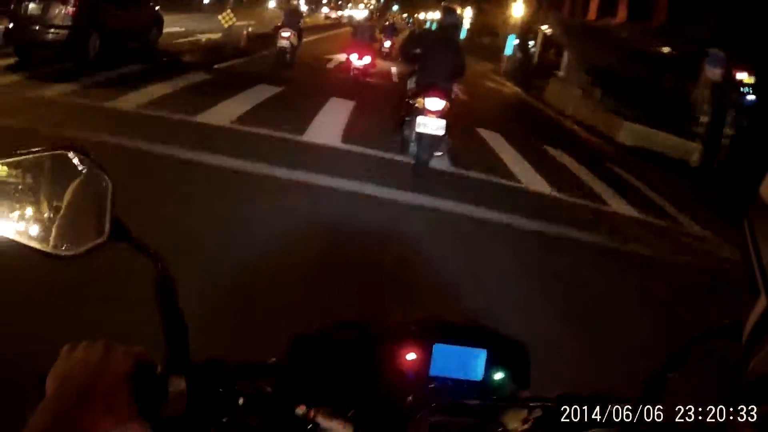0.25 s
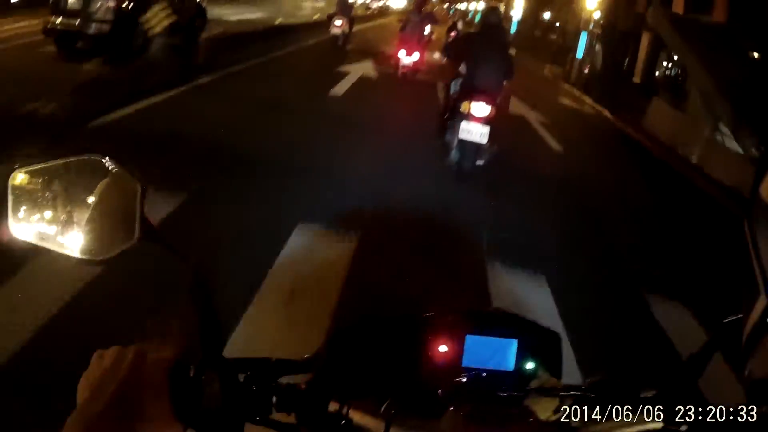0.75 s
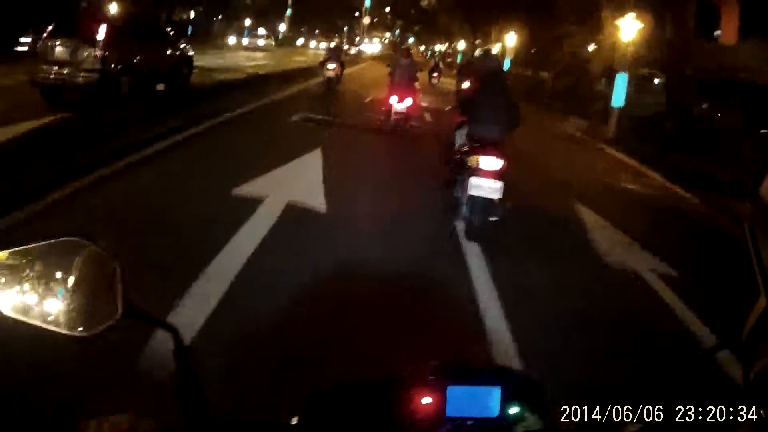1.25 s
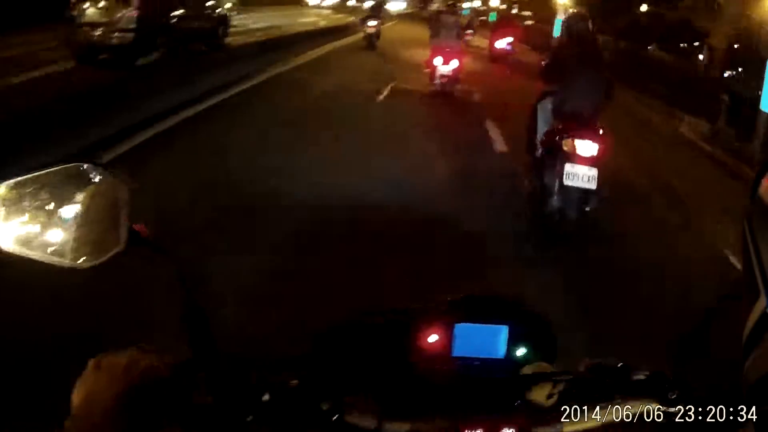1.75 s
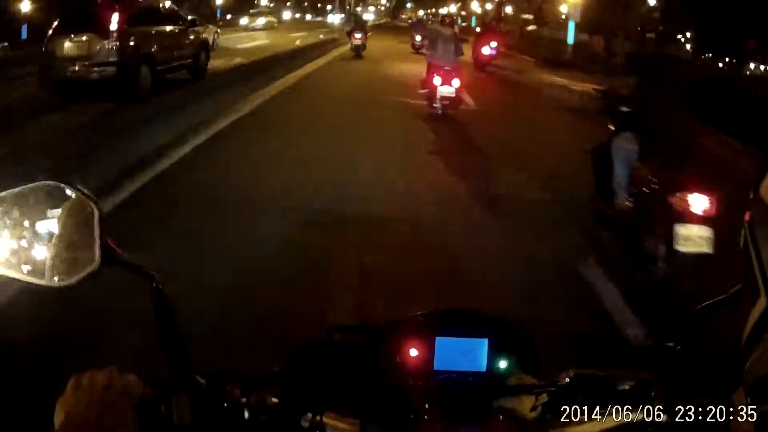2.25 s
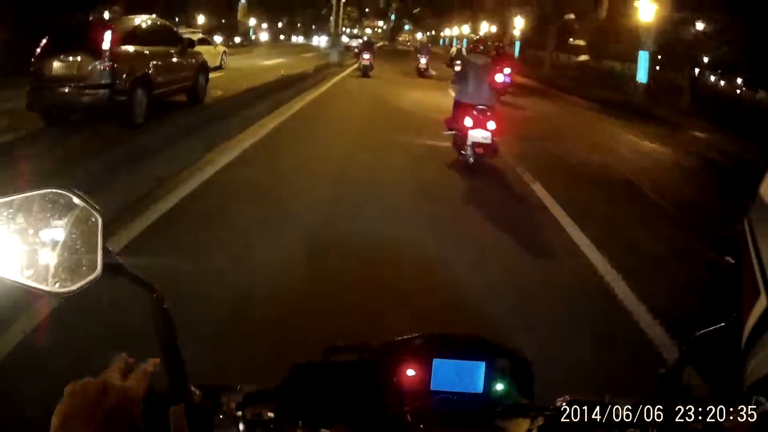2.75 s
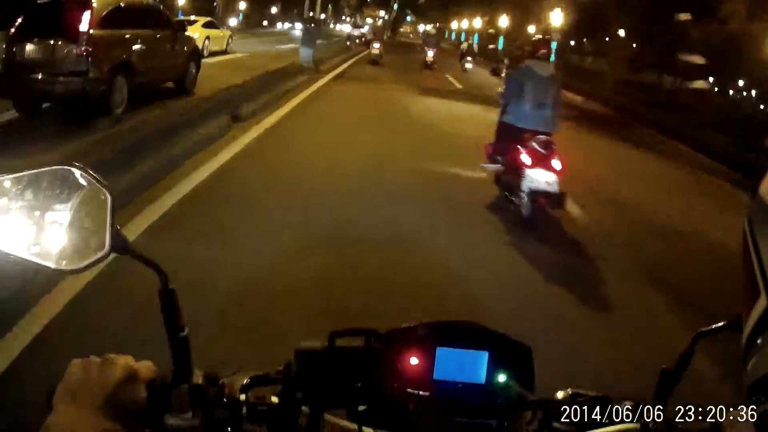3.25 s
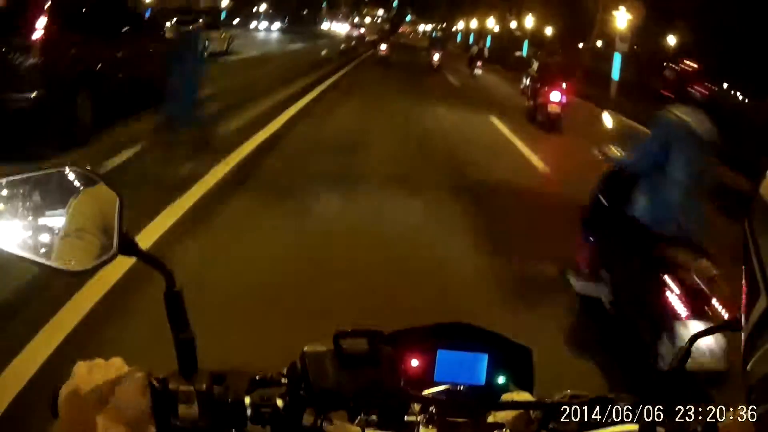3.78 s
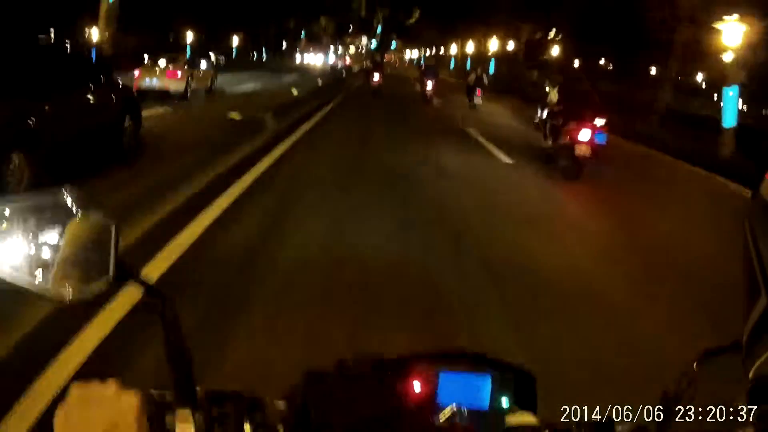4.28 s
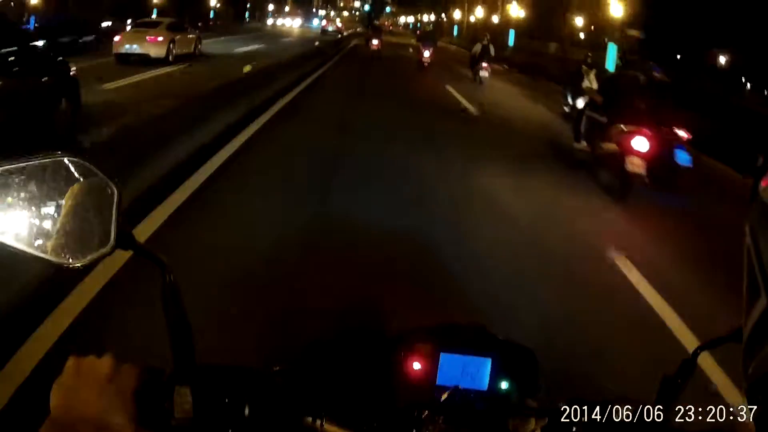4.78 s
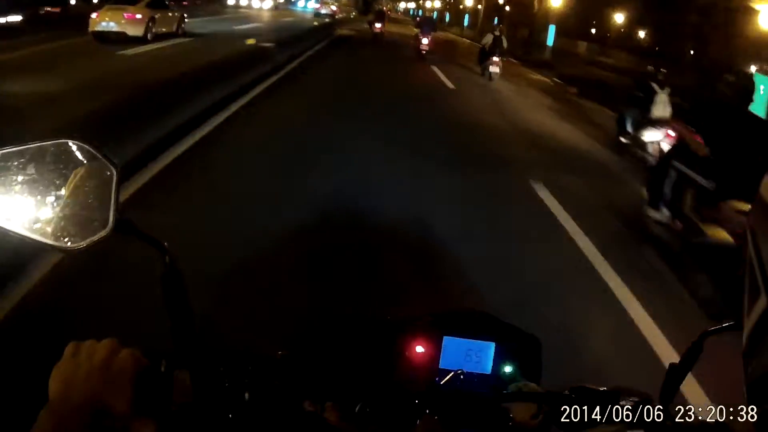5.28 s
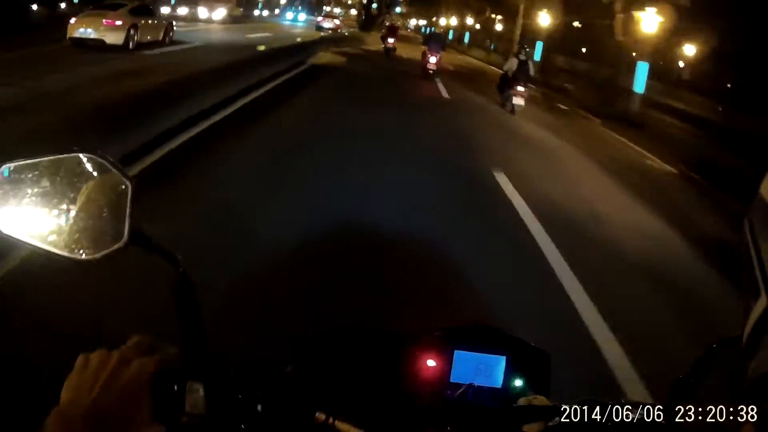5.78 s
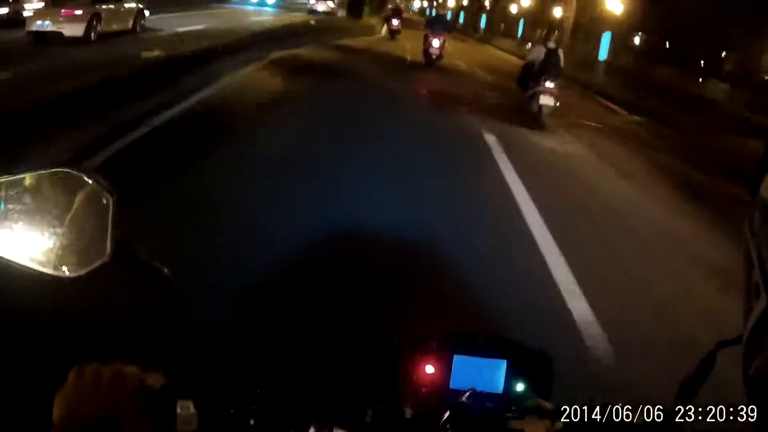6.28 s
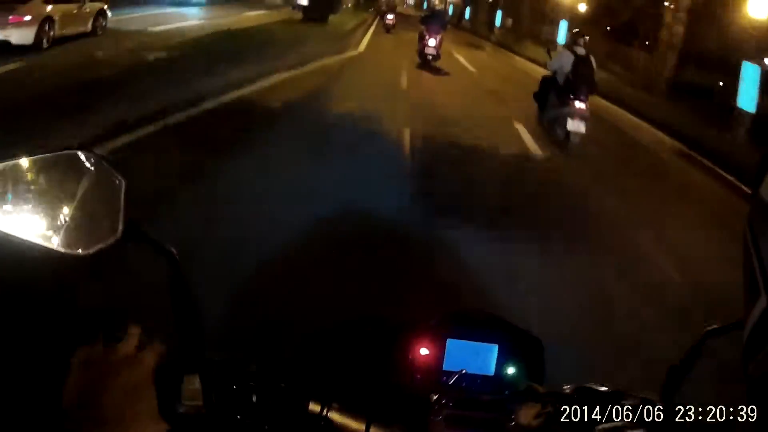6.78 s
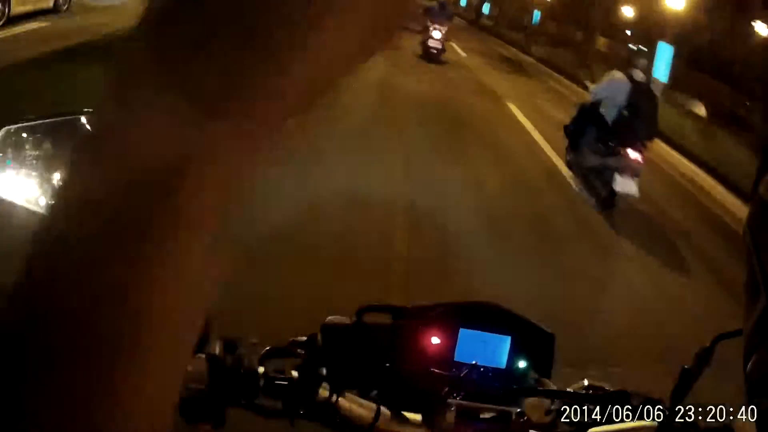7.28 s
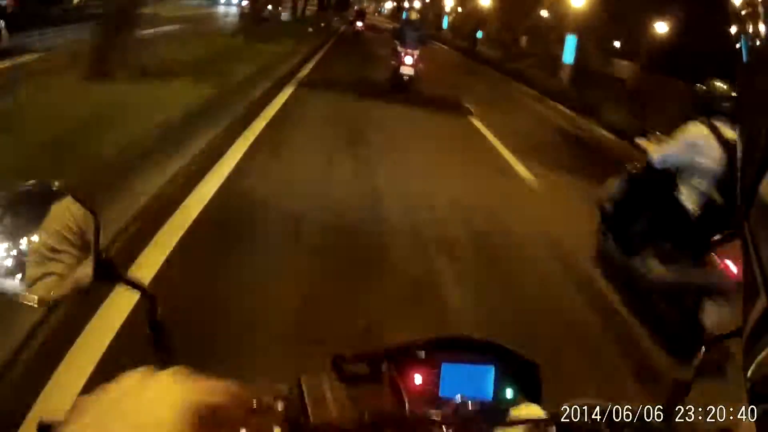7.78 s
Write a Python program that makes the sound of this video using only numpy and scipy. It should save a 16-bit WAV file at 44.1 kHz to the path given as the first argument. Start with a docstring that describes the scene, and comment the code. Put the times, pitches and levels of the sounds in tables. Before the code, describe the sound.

Wind rumbles over a rider's microphone as a motorcycle gathers speed along a road. The close engine dips briefly, then climbs with a pulsing exhaust and metallic rasp, shifts up and climbs again. The wind grows into heavy, low buffeting that overloads into crackle, with occasional small dry snaps. Near the end the throttle eases and the engine settles to a softer, steady whirr beneath the gusts.

```python
"""A single-cylinder motorcycle pulls away through the gears, heard from a camera on the rider.
At first the revs drop under a thin, fading whine. Then the throttle opens: every firing thumps
the exhaust pipe, and a hard metallic rasp bites between the thumps. A gear change breaks the pull
near 3.5 s, while the building wind buffets the microphone and overloads it into crackle.
At 6 s the rider eases off and cruises, the rasp loosening to a whirr under gusts and dry ticks."""
import sys
import numpy as np
from scipy import signal
from scipy.fft import rfft, irfft, next_fast_len
from scipy.io import wavfile
from scipy.ndimage import uniform_filter1d

SR = 44100
rng = np.random.default_rng(int(sys.argv[2]) if len(sys.argv) > 2 else 0)


def digitize_waveform(pressure):
    """Quantize a signal to 16-bit integers and store it at the path in sys.argv[1].

    Rows of a 2-D input are taken as channels; values are limited to [-1, 1].
    """
    field = np.atleast_2d(pressure).T
    bounded = np.clip(field, -1, 1)
    quanta = np.round(bounded * 32767).astype(np.int16)
    wavfile.write(sys.argv[1], SR, quanta)


N = 354563
TIME = np.arange(N) / SR

# the engine pulls, drops at each gear change, then cruises: time_s, firing_rate_hz
REVS = [(0, 42.23), (.13, 41.96), (.3, 32.34), (.65, 32.54), (1.35, 36.13), (2.4, 42.53), (3.03, 45.95),
        (3.3, 47.27), (3.42, 46.57), (3.55, 37.45), (4.45, 39.69), (5.6, 43.21), (6, 44.09), (6.15, 43),
        (6.35, 36.7), (7.1, 36.1), (8.04, 35.7)]
# air streaming past the camera: time_s, share_of_top_speed (0-1)
AIRSPEED = [(0, 0.3), (1, 0.19), (2.2, 0.43), (3.1, 0.73), (4.3, 0.8), (5.9, 0.93), (7.3, 0.88),
            (8.04, 0.75)]
# ringing engine metal: pitch_hz, width_hz, level_db
METAL_MODES = [(820, 340, -9), (1148, 194, 5), (1437, 216, 7), (1619, 160, 7.5), (1747, 317, 3),
               (2166, 540, -12.5)]
# the hollow camera housing, rung by the engine's treble: pitch_hz, width_hz, level_db
HOUSING_MODES = [(3287, 640, -1), (3735, 840, -10), (5200, 870, -21.5), (5700, 550, -18.5),
                 (6980, 830, -19.5), (8040, 910, -22.5), (9900, 1100, -26.5), (13100, 1700, -27.5),
                 (14800, 2100, -23.5)]


def exhaust(cycles, spread_db=0.36, bark_db=-29, gas_db=-25, shell_db=-28, hum_db=-28):
    """Each exhaust valve opening thumps the pipe; a gas puff rings pipe and metal; the crank hums."""
    # the body of the thump, the pipe's resonances: pitch_hz, width_hz, level_db
    pipe_modes = [(49.4, 20, -7.5), (74.3, 57.8, 1.5), (178.5, 46.4, -2.5), (252.7, 83, 2),
                  (323.3, 39, -1.5), (398.8, 34, -10.5), (465.5, 38, -11), (503.7, 53.6, -8.5),
                  (579, 83, -22.5)]
    # the bark, the exhaust's upper overtones: pitch_hz, width_hz, level_db
    bark_modes = [(665, 96, -6), (835, 120, -11.5), (1135, 63, -2.5), (1300, 270, -8.5)]
    clicks = np.diff(np.floor(cycles - .67), prepend=-1) * amp(spread_db * noise())  # one a cycle
    body = thinned(muffler(ring(clicks, pipe_modes)))
    thumps = steadied(body + amp(bark_db) * ring(clicks, bark_modes), size=8000)
    puffs = noise() * burst(cycles, at=.86, width=.11)
    gas = amp(gas_db) * ring(puffs, pipe_modes)
    shell = amp(shell_db) * ring(puffs, METAL_MODES)
    hum = amp(hum_db) * evened(np.cos(4 * np.pi * (cycles - .86)))  # two crank turns to a firing
    gain = effort(rest_db=-20.5, throttle_db=9, airspeed_db=-2, octave_db=2) * overrun()
    return gain * (thumps + gas + shell) + hum


def muffler(x, centre_hz=330, width_hz=170):
    """The silencer chambers delay the low mids, so each thump swells over a few swings."""
    radius = np.exp(-np.pi * width_hz / SR)
    poles = [1, -2 * radius * np.cos(2 * np.pi * centre_hz / SR), radius ** 2]
    return signal.lfilter(poles[::-1], poles, x)  # all-pass


def thinned(x, shut_db=4.0, open_db=-2.5, edge_hz=370):
    """The exhaust note thins with the throttle shut: a high-passed copy reshapes its upper tones."""
    upper = signal.sosfiltfilt(signal.butter(4, edge_hz, "high", fs=SR, output="sos"), x)
    upper_gain = amp(shut_db + (open_db - shut_db) * throttle())
    return x + (upper_gain - 1) * upper


def overrun(dip_db=-2.5, full_fall_hz_per_s=50):
    """Gain of the firings: they weaken while the engine winds down."""
    fall = uniform_filter1d(-np.gradient(curve(REVS)) * SR, size=3000)
    return amp(dip_db * np.clip(fall / full_fall_hz_per_s, 0, 1))


def throttle():
    """How wide the throttle stands, 0-1."""
    # the rider opens up, shuts off for each gear change, then eases off: time_s, opening (0-1)
    twist_grip = [(0, 0.33), (.22, 0), (.72, 0.02), (.92, 0.25), (1.18, 0.19), (1.42, 0.69), (2.1, 0.68),
                  (2.7, 0.83), (3.22, 0.85), (3.44, 0.04), (3.62, 0.64), (4.4, 0.81), (5.2, 0.9),
                  (5.88, .82), (6.05, 0.06), (7.1, 0.09), (8.04, 0.3)]
    return np.clip(curve(twist_grip), 0, 1)


def effort(rest_db, throttle_db, airspeed_db, octave_db, low_revs_hz=33):
    """Gain of an engine layer: it rides the throttle, the airspeed and each octave of revs."""
    octaves = np.log2(curve(REVS) / low_revs_hz)
    return amp(rest_db + throttle_db * throttle() + airspeed_db * curve(AIRSPEED) + octave_db * octaves)


def rasp(cycles, pitch_hz=1487, rise_hz=180, uneven_db=5.2, grit_db=-8, fizz_db=-19, loose_db=-1):
    """Under throttle, one hard ringing burst a cycle; shut off, it loosens into a metallic whirr."""
    centre, crack_lead_s = .4412, .0012  # the burst's place in the cycle; its crack comes just ahead
    strength = amp(uneven_db * curve(AIRSPEED) * np.tanh(drift(17)))
    gate = burst(cycles, at=centre, width=.054) * strength
    from_centre_s = cycle_offset(cycles, centre) / curve(REVS)
    phase = 2 * np.pi * (pitch_hz + rise_hz * throttle()) * from_centre_s
    tone = evened(gate * np.sin(phase + .49 * drift(200)))
    crack = noise() * np.roll(gate, -int(crack_lead_s * SR))
    grit = amp(grit_db) * ring(crack, METAL_MODES)
    fizz = amp(fizz_db) * ring(crack, HOUSING_MODES)
    hard = steadied(tone + grit + fizz, size=8000)
    hard_share = .8 * throttle() ** 2
    taps = burst(cycles, at=.88, width=.06) + .6 * burst(cycles, at=.17, width=.05)
    flutter = .8 + 1.5 * np.sqrt(hard_share) * taps
    whirr = amp(loose_db) * steadied(ring(noise() * flutter, METAL_MODES), size=8000)
    blend = np.sqrt(hard_share) * hard + np.sqrt(1 - hard_share) * whirr
    return effort(rest_db=-42.5, throttle_db=12, airspeed_db=2.5, octave_db=6.5) * blend


def clatter(cycles, grain_db=2):
    """Valves tap twice a cycle over the sizzle of the chain."""
    taps = burst(cycles, at=.92, width=.06) + .7 * burst(cycles, at=.15, width=.05)
    sizzle = noise() * amp(grain_db * drift(250))
    gain = effort(rest_db=-56.5, throttle_db=6, airspeed_db=2, octave_db=4.5)
    return gain * ring(sizzle * (1 + taps), HOUSING_MODES)


def wind_rumble(rest_db=-21, airspeed_db=6.55, unsteady_db=1.5):
    """Slow pressure swings on the microphone grow with airspeed and heave in long surges."""
    # the rumble's sub-heavy spectrum: frequency_hz, level_db
    rumble_colour = [(6, -18.5), (18, -3), (30, 1.5), (48, -7), (70, -13), (120, -39), (400, -85)]
    # surges of deep pressure: start_s, length_s, relative_level_db
    surges = [(1.313, 0.029, -10.5), (2.989, 0.032, -8), (3.13, 0.23, -10.5), (3.47, 0.071, -11.5),
              (3.718, 0.083, -8), (4.07, 0.11, -8.5), (4.243, 0.25, -9), (4.649, 0.11, -8),
              (4.913, 0.037, -10), (5.048, 0.13, -6), (5.33, 0.68, -8), (6, 0.046, -11.5),
              (6.195, 0.032, -10), (6.386, 0.24, -6), (6.784, 0.052, -9), (6.924, 0.19, -10),
              (7.295, 0.11, -8), (7.616, 0.17, -11.5)]
    surging = sum(amp(db + 1) * swell(start_s + length_s / 2, half_width_s=.026 + .66 * length_s)
                  for start_s, length_s, db in surges)
    flow = amp(rest_db + airspeed_db * curve(AIRSPEED) + unsteady_db * drift(6.6))
    return np.hypot(flow, surging) * steadied(colour(noise(), rumble_colour), size=3000)


def wind_buffeting(rest_db=-24, airspeed_db=11.23, lumpy_db=1.5, shove_hz=27):
    """Lumpy eddies grow with airspeed; sudden gusts swell them and shove the diaphragm."""
    # the eddies' bassy spectrum: frequency_hz, level_db
    eddy_colour = [(25, -11.5), (55, -1.5), (85, 1), (130, -1.5), (220, -3.5), (330, -5.5), (400, -8.5),
                   (500, -16.5), (570, -25), (680, -40.5), (1100, -38), (2500, -56.5), (6000, -80)]
    # sudden gusts: peak_s, buffeting_db, half_width_s, shove_db
    gusts = [(0.07, -18.5, 0.053, -12.5), (0.302, -21, 0.022, -8.5), (0.492, -15, 0.017, -11),
             (1.25, -13, 0.033, -21), (1.326, -20, 0.013, -11), (3.175, -19, 0.076, -12),
             (3.365, -12, 0.046, -15), (3.769, -20, 0.034, -10.5), (4.391, -15.5, 0.1, -11.5),
             (5.359, -9, 0.056, 1), (5.885, -7, 0.06, -19), (6.11, -10.5, 0.039, -21),
             (6.503, -17.5, 0.049, -12), (6.684, -10.5, 0.052, -4.5), (6.873, -11, 0.052, -17),
             (7.279, -7, 0.03, -8), (7.472, -7, 0.038, -17.5), (7.71, -12, 0.077, -14)]
    lumps = noise() * amp(lumpy_db * drift(23.8))
    eddies = steadied(colour(lumps, eddy_colour), size=3000)
    gusting, shove = np.zeros(N), np.zeros(N)
    for peak_s, buffeting_db, half_width_s, shove_db in gusts:
        gust = swell(peak_s, half_width_s)
        gusting += amp(buffeting_db) * gust
        shove += amp(shove_db) * gust * np.cos(2 * np.pi * shove_hz * (TIME - peak_s))
    flow = amp(rest_db + airspeed_db * curve(AIRSPEED))
    return np.hypot(flow, gusting) * eddies + shove


def ticks(boost_db=14, half_width_s=.0016):
    """Sharp, dry snaps of noise poke out of the ride."""
    # each snap: time_s, relative_level_db
    snaps = [(0.088, -44), (0.4853, -50), (0.496, -47), (1.3132, -43), (1.423, -43.5), (1.5083, -42),
             (6.5131, -42), (7.2794, -47), (7.456, -43), (7.4789, -41)]
    # the snaps' mid-forward spectrum: frequency_hz, level_db
    snap_colour = [(200, -5), (700, -2.5), (2000, -7.5), (5000, -27.5), (10000, -38), (16000, -45)]
    gate = sum(amp(boost_db + db) * swell(time_s + half_width_s / 2, half_width_s)
               for time_s, db in snaps)
    return gate * evened(colour(noise(), snap_colour))


def whine(pitch_hz=1809, level_db=-50, waver=.0025, fade_s=.98):
    """One faint, wavering tone fades as the bike gets under way."""
    phase = 2 * np.pi * np.cumsum(pitch_hz * (1 + waver * drift(25))) / SR
    return amp(level_db) * swell(0, fade_s) * evened(np.sin(phase))


def amp(db):
    """Decibels to gain."""
    return 10 ** (np.asarray(db) / 20)


def evened(x):
    """Scales to rms 1."""
    return x / np.sqrt(np.mean(x ** 2) + 1e-20)


def steadied(x, size):
    """Holds the rms near 1 over stretches of size samples."""
    return x / np.sqrt(uniform_filter1d(uniform_filter1d(x ** 2, size), size // 2) + 1e-12)


def curve(rows):
    """An automation line through rows of time_s, value."""
    return np.interp(TIME, *np.transpose(rows))


def swell(peak_s, half_width_s):
    """A bell-shaped rise and fall."""
    near = abs(TIME - peak_s) < 3 * half_width_s
    shape = np.zeros(N)
    shape[near] = np.exp(-2 * ((TIME[near] - peak_s) / half_width_s) ** 2)
    return shape


def cycle_offset(cycles, at):
    """Signed distance, in cycles, from a point of the engine cycle."""
    return (cycles - at + .5) % 1 - .5


def burst(cycles, at, width):
    """A smooth gate that opens once a cycle; at and width are shares of the cycle."""
    return np.exp(-.5 * (cycle_offset(cycles, at) / width) ** 2)


def noise():
    """White noise."""
    return rng.standard_normal(N)


def drift(hz):
    """A random wander of rms 1, rolling off above the given rate."""
    size = next_fast_len(N, True)
    rolloff = np.exp(-(np.fft.rfftfreq(size, 1 / SR) / hz) ** 2)
    return evened(irfft(rfft(noise(), size) * rolloff, size)[:N])


def colour(x, points):
    """Minimum-phase EQ through rows of frequency_hz, level_db: a click rings after, never before."""
    hz, db = np.transpose(points)
    log_hz = np.log(np.fft.rfftfreq(16384, 1 / SR) + 1)
    cepstrum = irfft(np.log(amp(np.interp(log_hz, np.log(hz), db))))
    half = len(cepstrum) // 2
    cepstrum[1:half] *= 2
    cepstrum[half + 1:] = 0
    impulse = irfft(np.exp(rfft(cepstrum)))[:half]
    return signal.oaconvolve(x, impulse)[:N]


def ring(x, modes, floor_db=-42.5):
    """Plays x through steep resonances, each with a faint shelf below it, at rms 1."""
    hz = np.geomspace(10, SR / 2, num=1500)
    power = np.zeros_like(hz)
    for pitch_hz, width_hz, db in modes:
        power += amp(db) ** 2 / (1 + ((hz - pitch_hz) / (width_hz * .63)) ** 2) ** 3
        power += amp(db + floor_db) ** 2 / (1 + (hz / pitch_hz) ** 8)
    return evened(colour(x, np.column_stack([hz, 10 * np.log10(power)])))


def scene():
    """One crank drives exhaust, rasp and clatter; the wind blows over it all, in mono."""
    cycles = np.cumsum(curve(REVS) * (1 + .001 * drift(10))) / SR
    engine = exhaust(cycles) + rasp(cycles) + clatter(cycles)
    return (engine + wind_rumble() + wind_buffeting() + ticks() + whine())[None]


def record(dry, drive_db=0.5, ceiling=.71, cutoff_hz=16150):
    """The microphone amplifier clips the peaks into crackle; a steep low-pass trims the top."""
    clipped = np.clip(dry * amp(drive_db), -ceiling, ceiling)
    lowpass = signal.firwin(255, cutoff_hz, window=("kaiser", 9), fs=SR)
    return signal.filtfilt(lowpass, 1, clipped)


dry = scene()
out = record(dry)
digitize_waveform(out)
```